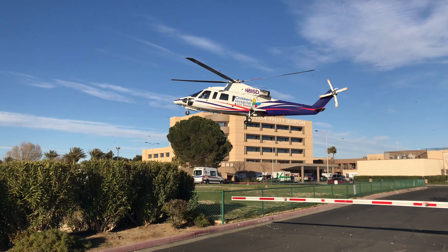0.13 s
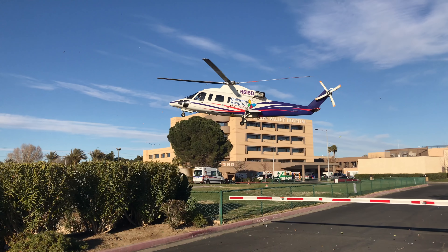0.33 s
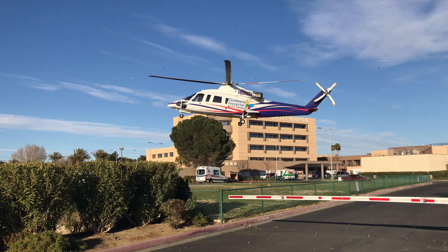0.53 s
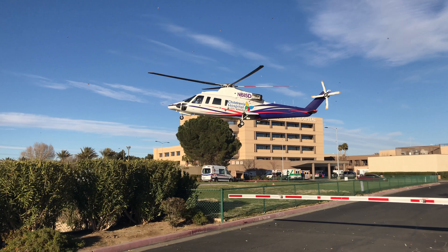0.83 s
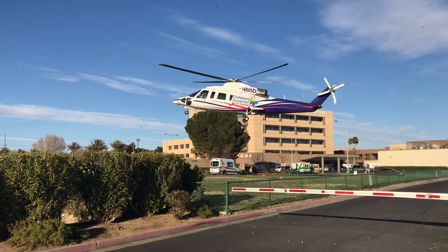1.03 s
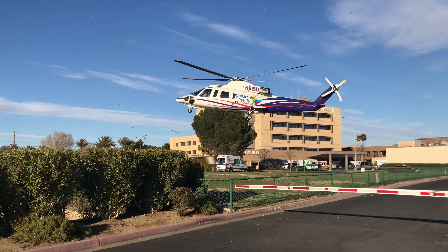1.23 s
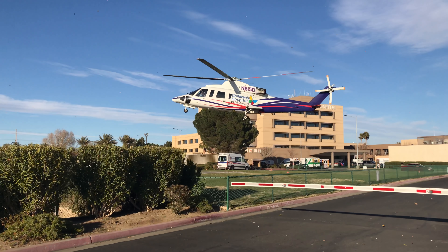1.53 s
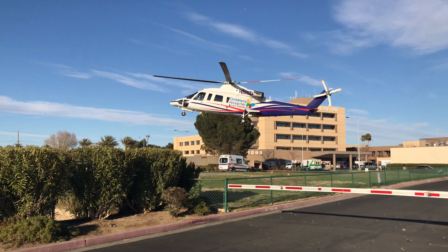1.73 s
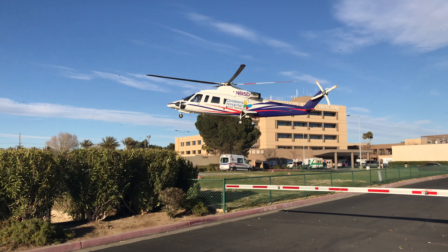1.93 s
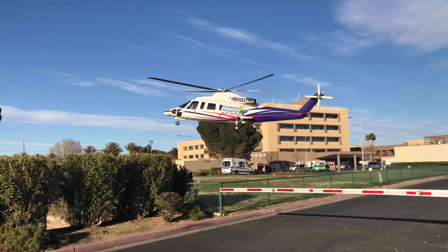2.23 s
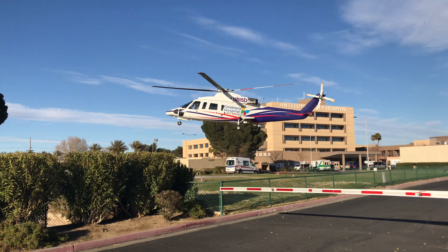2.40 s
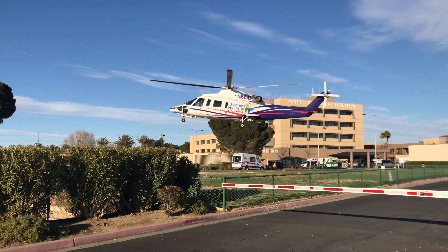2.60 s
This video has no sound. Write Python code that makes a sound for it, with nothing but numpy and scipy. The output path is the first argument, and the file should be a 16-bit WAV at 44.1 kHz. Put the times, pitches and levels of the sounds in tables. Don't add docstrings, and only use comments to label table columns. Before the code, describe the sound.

Hovering helicopter with fast blade slaps, tail rotor hum and hissing engines, briefly cutting out, returning louder.

```python
import sys
import numpy as np
from scipy import signal
from scipy.io import wavfile
from scipy.ndimage import uniform_filter1d

SR = 44100
rng = np.random.default_rng(int(sys.argv[2]) if len(sys.argv) > 2 else 0)


def int16_out(signal):
    q = np.round(np.clip(np.atleast_2d(signal).T, -1, 1) * 32767)
    wavfile.write(sys.argv[1], SR, q.astype(np.int16))


def decibels_to_gain(level_db):
    exponent = np.asarray(level_db, float) / 20
    return 10 ** exponent


N = 121716
TIME_S = np.arange(N) / SR

BLADE_HZ, TAIL_PER_BLADE = 20.8, 5.5
BLADE_AT_S, TAIL_AT_S = 0.046, 0.00681
DROP_S, RETURN_S = 1.9335, 2.1745


def evened(x):
    return x / np.sqrt(np.mean(x ** 2) + 1e-20)


def control(index):
    # start_s, exhaust_db, tail_hum_db, wake_tone_db, crackle_db, intake_db; up to the dropout
    hover_before = [(0, -13, -23.5, -19.5, -27.5, -16.5), (.15, -15, -23, -21.5, -21.5, -18),
                    (.3, -14.5, -25, -19.5, -21.5, -18), (.42, -18, -24.5, -26.5, -24.5, -18),
                    (0.551, -16.5, -28, -22.5, -20.5, -17.5), (.75, -17, -29.5, -26, -26, -17.5),
                    (.95, -12.5, -25.5, -20.5, -19, -16.5), (1.1, -16, -27, -18, -21.5, -16),
                    (1.25, -15.5, -28.5, -22.5, -21, -16), (1.501, -16, -23.5, -16.5, -28, -17),
                    (1.7, -17, -26, -21, -21.5, -17.5), (1.93, -17, -24.5, -19, -21, -16.5)]
    hover_after = [
        (2.174, -5, -11, -13, -16.5, -7.5),
        (2.251, -11, -17, -23.5, -21, -13.5),
        (2.35, -15, -20, -21, -19, -12.5),
        (2.45, -14.5, -19, -24, -20, -15),
        (2.6, -15.5, -19.5, -30, -29.5, -17),
        (2.76, -13, -19.5, -42, -30, -15.5),
    ]
    rows = np.vstack([hover_before, hover_after])
    return np.interp(TIME_S, rows[:, 0], rows[:, index])


def drift(rate_hz):
    smooth = evened(signal.resample(rng.standard_normal(400), 8000))
    return smooth[(TIME_S * rate_hz * 40).astype(int) % 8000]


def noise(colour_points, patchy_db=0.0):
    frames, hz = N // 256 + 5, np.fft.rfftfreq(1024, 1 / SR)
    real, imag, patches = rng.standard_normal((frames, 513, 3)).T
    patches = uniform_filter1d(patches, size=8, axis=0)
    patches = evened(uniform_filter1d(patches, size=16, axis=1))
    point_hz, point_db = np.transpose(colour_points)
    colour_db = np.interp(np.log(hz + 1), np.log(point_hz), point_db, left=-70, right=-70)
    spectra = (real + 1j * imag) * decibels_to_gain(colour_db[:, None] + patchy_db * patches)
    return evened(signal.istft(spectra, nperseg=1024, noverlap=768)[1][:N])


def tone(multiple, waver_db, sway_rad):
    turns = multiple * BLADE_HZ * (TIME_S - BLADE_AT_S)
    strength = np.sqrt(2) * decibels_to_gain(waver_db * drift(3 + multiple / 4))
    sway = sway_rad * drift(multiple / 2)
    return strength * np.cos(2 * np.pi * turns + sway + 2 * np.pi * rng.random())


def blade_train(rate_hz, first_s, spread_db, jitter_s):
    luck = np.clip(rng.standard_normal((400, 2)), -2, 1.6)
    at = (first_s + np.arange(400) / rate_hz + jitter_s * luck[:, 1]) * SR
    heard = (at > 0) & (at < N)
    train = np.zeros(N)
    train[at[heard].astype(int)] = decibels_to_gain(spread_db * luck[heard, 0])
    return evened(train) / np.sqrt(SR / rate_hz)


def passes(train, rise_s, fall_s):
    t = np.arange(-1000, 1001) / SR
    burst = np.where(t < 0, np.exp(-(t / rise_s) ** 2), np.exp(-abs(t) / fall_s))
    return signal.oaconvolve(train, burst, "same")


def turbines():
    # pitch_hz, level_db per Hz
    roar_colour = [(37, -23.5), (62, -2), (130, -3.5), (290, -1), (430, -10.5), (620, -3), (1200, -2),
                   (3500, -24)]
    # pitch_hz, level_db per Hz
    hiss_colour = [(1500, -2), (3200, -3), (4700, -7), (5000, -9.5), (6900, -10), (7600, -14),
                   (10500, -19.5), (17500, -23)]
    # start_s, pitch_hz
    whine_path = [(0, 9290), (.7, 9260), (1.3, 9320), (1.9, 9360), (2.4, 9380), (2.76, 9330)]
    exhaust_db, intake_db = control(index=1), control(index=5)
    roar = decibels_to_gain(exhaust_db - 5) * noise(roar_colour, patchy_db=1.5)
    hiss = decibels_to_gain(intake_db - 8.5 + 0.37 * drift(15)) * noise(hiss_colour, patchy_db=0.46)

    at_s, pitch_hz = np.transpose(whine_path)
    spin = np.exp(2j * np.pi * np.cumsum(np.interp(TIME_S, at_s, pitch_hz)) / SR)
    air = rng.standard_normal((N, 2)) @ [1, 1j]
    whine = 0
    for width_hz, level_db in ((100, 0), (500, 0.5)):
        blur = signal.lfilter(*signal.butter(2, width_hz, fs=SR), air)
        whine = whine + decibels_to_gain(level_db) * evened((spin * blur).real)
    return roar + hiss + decibels_to_gain(intake_db - 22.5 + 0.4 * drift(16)) * whine


def tail_rotor():
    # multiple of blade rate, level_db, waver_db, sway_rad
    wake_tones = [(12, 0.5, 2.07, 0.35), (11, -7, 4.5, 1.3)]
    # multiple of blade rate, level_db
    blurred_tones = [(16.5, -23), (17.5, -19), (23, -23), (24, -20), (29.5, -15), (35, -19)]
    # pitch_hz, level_db per Hz
    crackle_colour = [(250, -23.5), (600, 2.5), (900, 0), (1600, -4), (3000, -15.5), (6000, -22),
                      (17500, -56.5)]
    # start_s, peak_db
    hard_snaps = [
        (0.085, -9),
        (.093, 0),
        (.985, 2.5),
        (1.138, -4),
        (1.154, -9),
        (1.169, -2.5),
        (1.205, -8),
        (1.230, -9),
        (1.274, -6),
        (1.399, -8),
    ]
    crack_s, snap_s, jitter_s = 0.0017, 0.00021, 0.0005
    hum = decibels_to_gain(control(index=2)) * tone(TAIL_PER_BLADE, 0.4, 0.15)
    clear = sum(decibels_to_gain(db) * tone(k, waver_db, sway_rad) for k, db, waver_db, sway_rad in wake_tones)
    blurred = sum(decibels_to_gain(db) * tone(k, 3, 1.4) for k, db in blurred_tones)
    wake = decibels_to_gain(control(index=3)) * clear + decibels_to_gain(control(index=1)) * blurred

    rate_hz = TAIL_PER_BLADE * BLADE_HZ
    puffs = passes(blade_train(rate_hz, TAIL_AT_S, 3.2, jitter_s), 0.77 * crack_s, crack_s)
    u = np.arange(-100, 101) / SR / snap_s
    snap = (1 - u ** 2 - 1.4 * u) * np.exp(-u ** 2 / 2)
    snaps = signal.oaconvolve(blade_train(rate_hz, TAIL_AT_S, 4, jitter_s), snap, "same")
    crackle = evened(puffs) * noise(crackle_colour, patchy_db=0.5) + decibels_to_gain(-4) * evened(snaps)

    hard = np.zeros(N)
    for at_s, peak_db in hard_snaps:
        hard[round(at_s * SR)] = decibels_to_gain(peak_db)
    return hum + wake + signal.oaconvolve(hard, snap, "same") + decibels_to_gain(control(index=4)) * crackle


def main_rotor():
    # multiple of blade rate, level_db before the dropout, level_db after
    thump_tones = [(2, -39, -35), (3, -50.5, -31.5), (4, -39.5, -29), (5, -52.5, -58), (6, -38.5, -38),
                   (7, -51.5, -29.5), (8, -50, -34.5), (9, -59, -30.5), (10, -40, -37.5), (13, -40.5, -56)]
    # start_s, body_db, sizzle_db
    hard_slaps = [(0.093, -23, -27), (0.137, -21, -34), (0.238, -15, -35), (0.284, -12, -28),
                  (0.333, -18, -38), (.47, -21, -31), (0.813, -18, -29), (.858, -31, -42),
                  (0.907, -17, -31), (1.004, -20, -34), (1.69, -22, -26), (1.738, -20.5, -43),
                  (2.209, -11, -35), (2.259, -11.5, -19), (2.308, -23, -25), (2.358, -25, -27),
                  (2.405, -11, -24), (2.452, -11, -26), (2.502, -16, -25), (2.549, -8, -20.5),
                  (2.599, -8.5, -24), (2.648, -14, -25), (2.694, -9.5, -25), (2.742, -9, -30)]
    # pitch_hz, level_db per Hz
    slap_colour = [(150, -16), (500, -8), (1050, 0), (1600, -5), (3000, -10), (7000, -26)]
    # pitch_hz, level_db per Hz
    sizzle_colour = [(1500, 4), (3000, -24), (6000, 5), (10000, -2), (17500, -14)]
    after = TIME_S > DROP_S
    opened_db = 8 * np.exp(-abs(TIME_S - RETURN_S) / 0.1)
    thump = 0
    for k, before_db, after_db in thump_tones:
        thump = thump + decibels_to_gain(np.where(after, after_db + opened_db, before_db)) * tone(k, 1.4, 0.21)

    body = decibels_to_gain(-20.5) * blade_train(BLADE_HZ, BLADE_AT_S, spread_db=2.5, jitter_s=0.003)
    sizzle = np.zeros(N)
    for at_s, body_db, sizzle_db in hard_slaps:
        body[round(at_s * SR)] += decibels_to_gain(body_db)
        sizzle[round(at_s * SR)] += decibels_to_gain(sizzle_db)
    slaps = passes(body, rise_s=0.004, fall_s=0.005) * noise(slap_colour, patchy_db=2)
    sizzles = passes(sizzle, rise_s=0.0025, fall_s=0.0061) * noise(sizzle_colour, patchy_db=2)
    return thump + slaps + sizzles


def scene():
    return (turbines() + tail_rotor() + main_rotor())[None]


def roll_off(x):
    return signal.sosfilt(signal.butter(12, 17960, fs=SR, output="sos"), x)


def record(dry):
    cut = signal.sosfilt(signal.butter(3, 36, "high", fs=SR, output="sos"), dry)
    hot = cut / (1 + abs(cut / 0.97) ** 6) ** (1 / 6)

    since_s, until_s = TIME_S - DROP_S, RETURN_S - TIME_S
    inside_s = np.minimum(since_s, 0.6 * until_s)
    dull = signal.lfilter(*signal.butter(2, 1300, fs=SR), hot)
    smear = dull * decibels_to_gain(-27 - 1100 * inside_s) * (inside_s < 0.022)
    edges = smear * (until_s < 0.023) + smear * (since_s < 0.018)
    hot = np.where(inside_s < 0, hot, edges)

    treble_limit = signal.firwin(1023, 17200, window=("kaiser", 5), fs=SR)
    return roll_off(signal.oaconvolve(hot, treble_limit[None], "same"))


dry = scene()
out = record(dry)
int16_out(out)
```